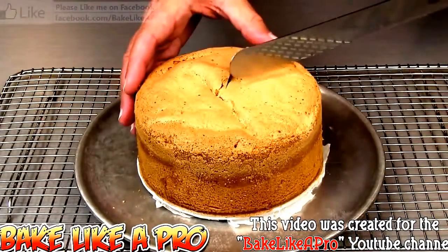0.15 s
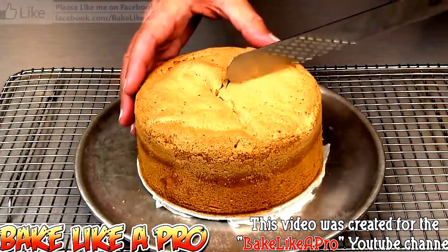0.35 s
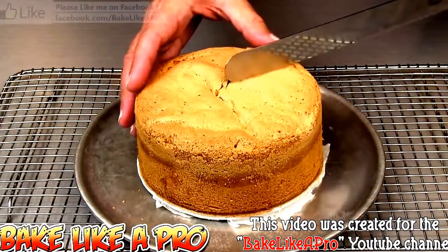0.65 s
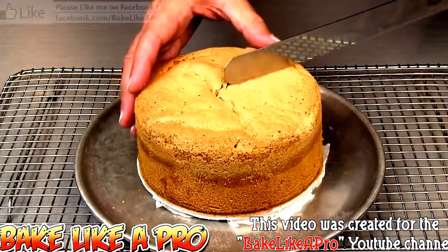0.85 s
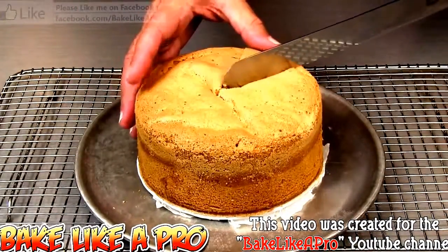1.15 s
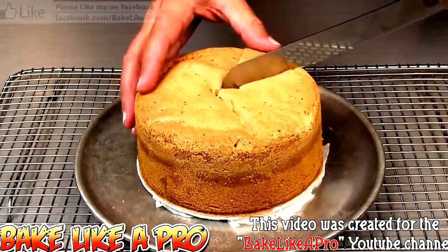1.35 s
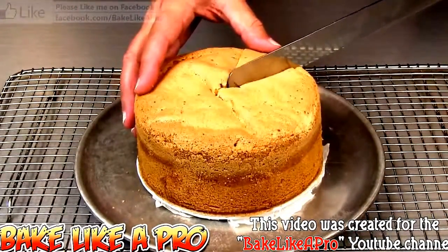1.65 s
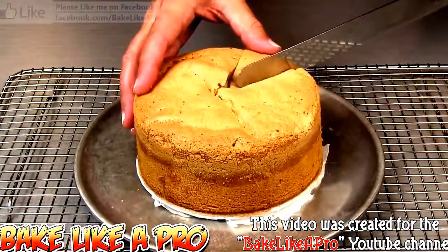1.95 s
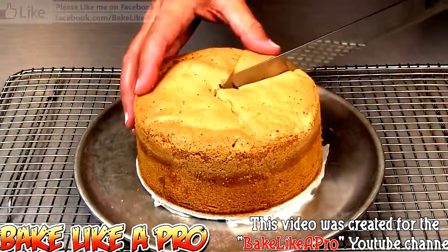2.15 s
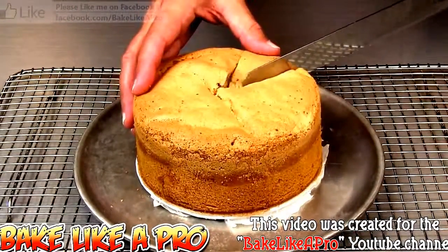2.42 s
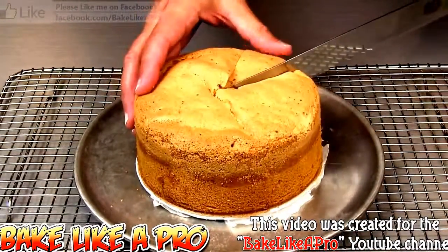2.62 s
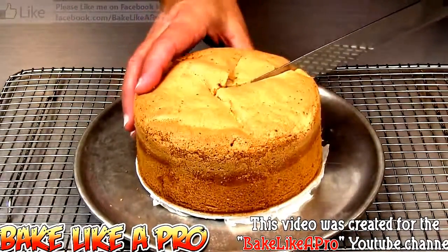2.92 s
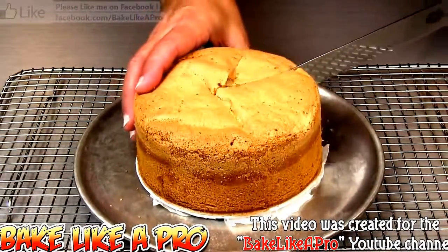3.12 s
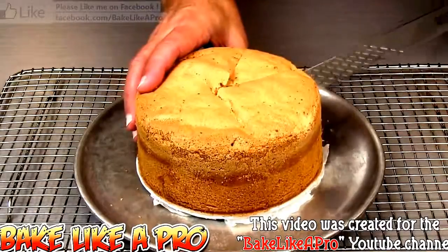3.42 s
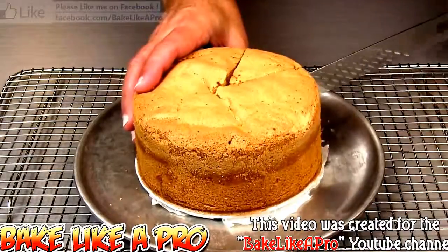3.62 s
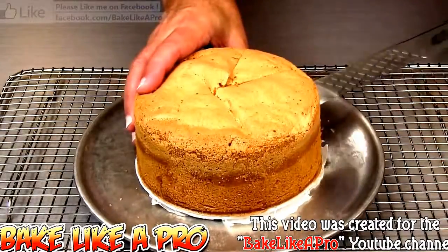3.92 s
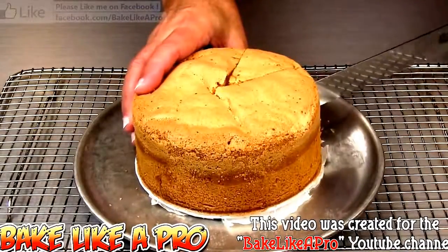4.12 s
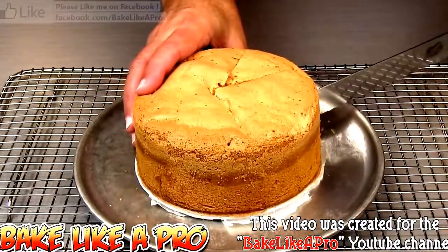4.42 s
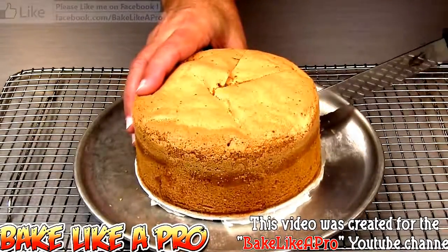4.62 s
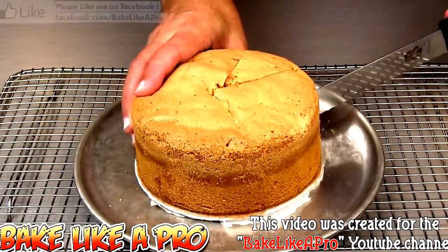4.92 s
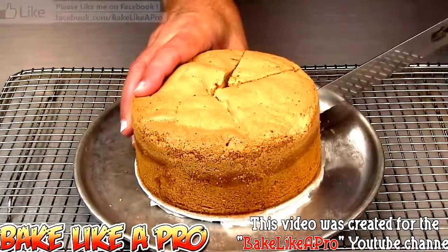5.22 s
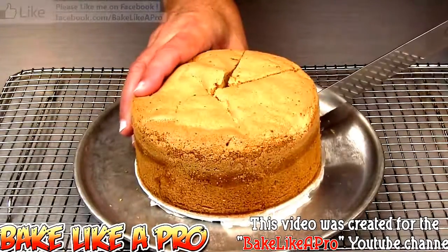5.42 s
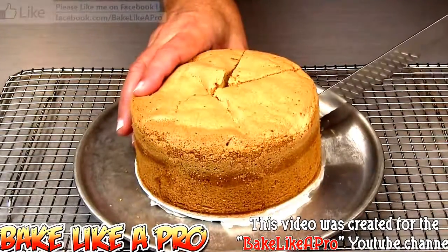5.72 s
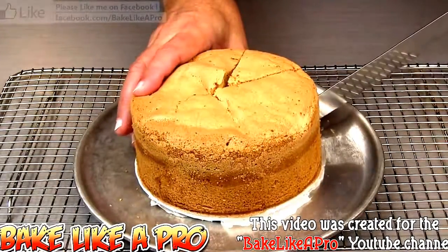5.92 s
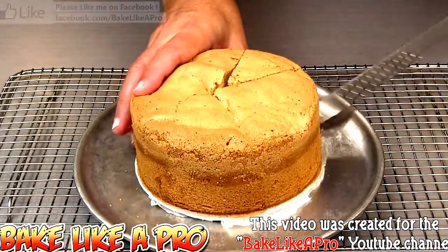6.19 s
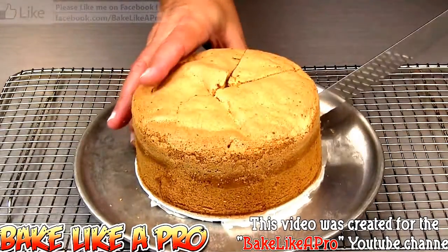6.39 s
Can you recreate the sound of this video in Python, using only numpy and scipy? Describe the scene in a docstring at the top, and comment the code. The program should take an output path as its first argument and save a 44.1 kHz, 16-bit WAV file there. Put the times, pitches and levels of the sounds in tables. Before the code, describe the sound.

Over steady kitchen fan hum, a blade rasps in cake, a pan rattles on a rack, metal scrapes faintly, then one loud clink.

```python
"""A kitchen appliance hums in a small room: filtered fan noise, housing resonances and motor tones.
From the start a long knife's edge rasps faintly in a sponge cake (random slips); moist crumbs snap (noise bursts).
From one second the strokes saw, about five a second, then fewer, and the pan rocks on its wire rack (modes and buzz).
Now and then the blade tings (modes); later it scrapes the pan (slips through broad resonances).
Near the end it clinks against the metal, once hard: an impact of crack, modes, shimmer and thud."""
import sys
import numpy as np
from scipy import signal
from scipy.fft import rfft, irfft, next_fast_len
from scipy.io import wavfile
from scipy.ndimage import map_coordinates

SR = 44100
rng = np.random.default_rng(int(sys.argv[2]) if len(sys.argv) > 2 else 0)


def persist_wave(psi):
    """Save psi, clipped to +-1, as 16-bit WAV."""
    counts = np.round(np.clip(psi, -1, 1) * 32767).astype(np.int16)
    wavfile.write(sys.argv[1], SR, np.atleast_2d(counts).T)


N = 288855


def amp(db):
    """Logarithmic level: decibels to amplitude gain."""
    return 10 ** (np.asarray(db) / 20)


def unit(x):
    """Normalisation: the signal scaled to rms 1."""
    return x / np.sqrt(np.mean(x ** 2) + 1e-20)


def along(points, hz):
    """Spectral envelope: (Hz, value) points interpolated on a logarithmic frequency axis."""
    point_hz, value = np.transpose(points)
    return np.interp(np.log(hz + 1), np.log(point_hz + 1), value)


def wobble(rate):
    """Slow random modulation: a smooth curve through rate random knots a second."""
    knots = rng.standard_normal(int(N * rate / SR) + 4)
    return map_coordinates(knots, [np.arange(N) * rate / SR])


def filtered(x, response):
    """Linear filtering: the spectrum of x times a response of frequency."""
    n = x.shape[-1]
    m = next_fast_len(n + 8192)
    return irfft(rfft(x, m) * response(np.fft.rfftfreq(m, 1 / SR)), m)[..., :n]


def spread(pair, width):
    """Interaural decorrelation: two unrelated signals, as middle and side, make left and right of rms 1."""
    mid, side = pair[0], width * pair[1]
    return unit(np.array([mid + side, mid - side]))


def noise(gain, width, size):
    """Coloured noise: white noise shaped by a gain of frequency, in stereo of rms 1."""
    return spread(filtered(rng.standard_normal((2, size)), gain), width)


def ring(modes, t, width, scatter_db):
    """Modal decay: damped sinusoids of starting mid rms about 1, each with its own phase in mid and side."""
    hz, db, t60 = np.transpose(modes)
    gain = amp(db + scatter_db * rng.standard_normal(len(hz)))
    phase = rng.uniform(0, 2 * np.pi, (2, len(hz), 1))
    decay = amp(-60 * t / t60[:, None])
    waves = gain[:, None] * decay * np.sin(2 * np.pi * hz[:, None] * t + phase)
    mid, side = waves.sum(axis=1) / np.sqrt(np.sum(gain ** 2) / 2)
    return np.array([mid + width * side, mid - width * side])


def add(track, s, sound):
    """Superposition: a sound laid into the track at s seconds."""
    part = track[:, round(s * SR):][:, :sound.shape[1]]
    part += sound[:, :part.shape[1]]


def grains(rate, spiky_db):
    """Stick-slip as shot noise: tiny slips at random moments, a few much larger than the rest."""
    size = amp(spiky_db * np.minimum(rng.exponential(size=N), 4))
    return (rng.random(N) < rate / SR) * size * rng.standard_normal((2, N))


RISE_SHARE, SWELL_POWER = 0.55, 1.74  # part of a push spent speeding up; roundness of its top


def swell(s, db, length):
    """Force envelope: a push of the hand peaks at s; length spans the points where gain is 1/e of the peak."""
    t = np.arange(N) / SR - s
    away = np.abs(t) / (length * np.where(t < 0, RISE_SHARE, 1 - RISE_SHARE))
    gain, near = np.zeros(N), away < 10
    gain[near] = amp(db) * np.exp(-away[near] ** SWELL_POWER)
    return gain


# the fan's broadband spectrum: pitch_hz [Hz], relative level_db [dB per Hz]
FAN_SPECTRUM = [(20, -28), (35, -22), (48, -14), (72, -16), (108, -9), (135, 0), (270, 0.5), (330, -0.5),
                (600, -2), (850, -5), (1300, -9), (2400, -17.5), (5000, -24.5), (16000, -33.5)]
# the housing's resonances: pitch_hz [Hz], half-width_hz at half amplitude [Hz], level_db [dB rms]
HOUSING = [(362, 8.7, -60), (400.3, 16.4, -56.5), (413.4, 11.2, -56.5)]
# the motor's tones: pitch_hz [Hz], mean level_db [dB rms]
MOTOR = [(59.4, -76.5), (98, -70.5), (240, -66.5), (296.1, -61), (560, -66.5)]


def appliance():
    """Broadband flow noise, resonance and tonal hum: fan, narrow housing bands and slightly unsteady motor."""
    t = np.arange(N) / SR
    air = amp(-51.0) * noise(lambda hz: amp(along(FAN_SPECTRUM, hz)), width=0.51, size=N)
    housing = np.zeros((2, N))
    for hz, band, db in HOUSING:
        housing += amp(db) * noise(lambda f: 1 / (1 + ((f - hz) / band) ** 2), width=0.14, size=N)
    motor = np.zeros(N)
    for hz, db in MOTOR:
        level = amp(db + 2.4 * wobble(6.1))
        motor += level * np.sqrt(2) * np.sin(2 * np.pi * hz * t + 0.24 * wobble(8))
    return air + housing + motor


# the room's reverberation time: pitch_hz [Hz], t60_s [s]
ROOM_DECAY = [(150, 0.37), (1000, 0.58), (3000, 0.44), (8000, 0.22), (16000, 0.23)]


def kitchen(x, wet_db):
    """Reverberation: convolution with a short decaying noise tail in which the treble dies first."""
    hz, t, z = signal.stft(rng.standard_normal((2, SR // 2)), SR, nperseg=256)
    decay = amp(-60 * t / along(ROOM_DECAY, hz)[:, None])
    tail = spread(signal.istft(z * decay, SR, nperseg=256)[1], width=0.56)
    # the answer starts 5 ms late
    tail = np.pad(tail / np.linalg.norm(tail[0]), ((0, 0), (SR // 200, 0)))
    wet = signal.fftconvolve(x.mean(axis=0)[None], tail, axes=1)[:, :N]
    return x + amp(wet_db) * wet


# the pan rocking on the rack: start_s [s], relative level_db [dB], chatter_s [s],
# side of the rack [0-1], treble_edge_hz [Hz], bass_edge_hz [Hz]
ROCKINGS = [(1.232, -27, 0.017, 0.1, 5300, 120), (1.3035, -31, 0.015, 0.05, 5140, 150),
            (1.356, -35.5, 0.011, 0, 4170, 300), (1.425, -27, 0.022, 1, 5570, 91),
            (1.487, -37.5, 0.016, 0.6, 5250, 300), (2.606, -42.5, 0.015, 1, 4570, 690),
            (4.228, -43.5, 0.017, 1, 3950, 1700), (4.766, -44, 0.015, 1, 3780, 1800)]
# modes of the loaded rack: pitch_hz [Hz], t60_s [s], relative level_db struck on side 0 [dB], on side 1 [dB]
RACK_MODES = [(137, 0.18, -8, -1), (372, 0.24, -6, -14), (643, 0.12, 2.5, -14), (704, 0.15, 0, -16),
              (998, 0.22, -27, -4.5), (1031, 0.25, -19, -6), (868, .21, -11, 4), (1675, .24, 0, -13),
              (1437, 0.091, -3, -2), (1830, 0.21, -0.5, -29), (2160, 0.22, -17, -5), (2250, 0.2, -17, -11),
              (2380, 0.15, -17, -3), (2624, 0.25, -7, -10), (2770, 0.17, -5, -7), (2830, 0.13, -13, -2),
              (3280, 0.17, -17, -9), (3670, 0.12, -18, -17), (4040, 0.09, -22, -15), (4380, 0.11, -5, -1),
              (4730, .1, -17, -16), (5500, 0.1, -10, -7)]
# the wires' dense buzz: pitch_hz [Hz], relative level_db [dB per Hz]
WIRE_BUZZ = [(60, -30), (130, 1), (500, -2.5), (1200, -3), (1600, 3), (2700, 2.5), (3800, -1), (4500, 0.5),
             (8000, 0.5), (16000, -21)]


def rack():
    """Modal excitation by position: the pan chatters on the wires; the side that lands sets which modes ring."""
    out, t = np.zeros((2, N)), np.arange(SR // 2) / SR
    for s, db, length, side, treble_hz, bass_hz in ROCKINGS:
        modes = [(hz, one + side * (other - one), t60) for hz, t60, one, other in RACK_MODES]
        body = ring(modes, t, width=0.31, scatter_db=0.5) * (1 - np.exp(-t / 0.0074))
        chatter = (1 - np.exp(-t / 0.0007)) * amp(-60 * np.maximum(t - length, 0) / 0.02)
        # the wires buzz on after the chatter has stopped
        lingering = amp(-14.5 - 60 * t / 0.21)
        buzz = noise(lambda hz: amp(along(WIRE_BUZZ, hz)), width=0.27, size=len(t)) * (chatter + lingering)

        def contact(hz):
            """Contact bandwidth: treble falls to a floor above one edge, bass fades below the other."""
            treble = amp(-18.5) + 1 / (1 + (hz / treble_hz) ** 22)
            return treble * hz ** 2 / (hz ** 2 + bass_hz ** 2)

        add(out, s, filtered(amp(db - 0.5) * body + amp(db - 3.5) * buzz, contact))
    return out


# the blade slipping free: start_s [s], level_db [dB]
SLIPS_FREE = [(2.204, -57), (3.279, -42.5), (3.345, -50), (3.453, -49), (4.489, -55)]
# the blade's own modes: pitch_hz [Hz], relative level_db [dB], t60_s [s]
BLADE_MODES = [(4590, -3, 0.037), (4960, 2, 0.038), (5400, -6, 0.057), (6200, -8, 0.054), (8750, -9, 0.047)]


def tings():
    """Damped free vibration: the thin blade springs loose and rings briefly, damped by the cake."""
    out, t = np.zeros((2, N)), np.arange(SR // 5) / SR
    for s, db in SLIPS_FREE:
        add(out, s, amp(db) * ring(BLADE_MODES, t, width=0.32, scatter_db=1.5))
    return out


# the blade's flat rubbing the pan's rim: pitch_hz [Hz], width_hz at half power [Hz], relative level_db [dB]
RIM_RESONANCES = [(960, 180, 0), (1450, 160, 0), (2045, 190, 4), (2560, 160, -2.5), (2980, 210, -9),
                  (3300, 100, -4.5), (3620, 160, -5.5), (4270, 370, -10), (4600, 300, -10),
                  (5050, 110, -14), (5500, 110, -11), (7700, 2500, -19), (12500, 4000, -20)]
# the blade dragging on the pan: peak_s [s], level_db before the unsteady force [dB], length_s [s]
DRAG_PUSHES = [(4.028, -52.5, 0.037), (4.56, -62, .22), (4.846, -63, 0.19), (5.187, -54, 0.14),
               (5.34, -55.5, .12), (5.6, -61, 0.16), (5.814, -59, 0.18), (6.303, -48, 0.052),
               (6.325, -32, 0.01)]
# the blade catching and skidding on the pan: peak_s [s], relative level_db [dB], 1/e half-length_s [s]
CATCHES = [(5.151, -49.5, 0.0066), (5.196, -49.5, 0.0072), (5.215, -49, .005), (5.23, -52, .008),
           (5.302, -50, .006), (5.324, -53, .009), (5.392, -50, 0.013), (5.567, -54.5, 0.0092),
           (5.622, -55, .004)]
# the dragged blade's faint whistle
WHISTLE_S, WHISTLE_DB, WHISTLE_LENGTH_S, WHISTLE_HZ = 4.75, -67, 0.57, 4500


def drag():
    """Stick-slip friction: small slips excite the pan, whose resonances the pressure keeps broad."""
    t = np.arange(N) / SR

    def metal(f):
        """Resonance: the summed power of the rim's bands, as amplitude."""
        return np.sqrt(sum(amp(2 * db) / (1 + ((f - hz) / (band / 2)) ** 2) for hz, band, db in RIM_RESONANCES))

    rub = spread(filtered(grains(rate=2400, spiky_db=1.5), metal), width=0.26)
    force = sum(swell(*push) for push in DRAG_PUSHES) * amp(0.86 * wobble(70))
    catches = sum(amp(db - 1) * np.exp(-((t - s) / length) ** 2) for s, db, length in CATCHES)
    whistle = noise(lambda hz: 1 / (1 + ((hz - WHISTLE_HZ) / 300) ** 2), width=.4, size=N)
    return (force + catches) * rub + swell(WHISTLE_S, WHISTLE_DB, WHISTLE_LENGTH_S) * whistle


# the blade striking the pan: start_s [s], relative crack_db [dB], ring_db [dB], shimmer_db [dB], thud_db [dB],
# tilt of crack, shimmer and thud [dB per octave]
STRIKES = [(5.754, -40.5, -49, -60.5, -76, 1.8), (6.3268, -10, -16.5, -23.8, -37.5, -.3),
           (6.356, -42, -40, -32, -45, 1.5), (6.385, -37, -47, -34.5, -39.5, 1),
           (6.423, -26, -59, -44.5, -60, 4.5)]
# modes of blade and pan together: pitch_hz [Hz], relative level_db [dB], t60_s [s]
PAN_MODES = [(360, -10, .28), (722, -12, .22), (960, -13, .38), (1377, -13, .2), (1684, -16, .5),
             (1843, -16, .45), (1963, -10, .33), (2004, -5, .42), (2080, -13, .45), (2172, -13, .36),
             (2319, -5, .22), (2456, -9, .38), (2502, -14, .45), (2672, 1.5, .11), (2960, -10, .3),
             (3045, -3, .18), (3347, 1, .085), (3410, -6, .16), (3716, 4, .06), (3850, 2, .05),
             (4072, -1, .11), (4761, 2, .085), (5121, -8, .12), (5430, -4, .07), (5642, -9, .1),
             (6120, -12, .19), (6738, -14, .2), (8140, -6, .13)]
# spectrum of the contact: pitch_hz [Hz], relative level_db [dB per Hz]
CRACK_SPECTRUM = [(80, -48), (300, -10.5), (1000, -8), (1600, -14), (2400, 2), (4000, -1), (6300, -11),
                  (8000, -9), (13000, -12.5), (16000, -21)]
# spectrum of the dense high modes: pitch_hz [Hz], relative level_db [dB per Hz]
SHIMMER_SPECTRUM = [(100, -41), (350, -14), (1000, -4), (1500, -3), (2200, 1), (3300, -9), (6000, -10),
                    (9000, -12), (13000, -17), (16000, -26)]
# spectrum of the loaded pan's thud: pitch_hz [Hz], relative level_db [dB per Hz]
THUD_SPECTRUM = [(40, -33), (105, -43), (145, 9.5), (190, -15), (290, -2.5), (400, -8), (900, -25),
                 (3000, -70)]


def clinks():
    """Impact excitation: steel on steel snaps, cracks, rings in modes, shimmers and thuds under the cake."""
    out, t = np.zeros((2, N)), np.arange(SR // 2) / SR
    snap = np.cos(2 * np.pi * 3400 * t) * amp(-60 * t / 0.0022)
    for s, crack_db, ring_db, shimmer_db, thud_db, tilt_db in STRIKES:

        def burst(points):
            """Spectral tilt: coloured noise leaning about 3 kHz."""
            tilted = lambda hz: amp(along(points, hz) + tilt_db * np.log2((hz + 50) / 3000))
            return noise(tilted, width=.36, size=len(t))

        crack = amp(crack_db) * (3.5 * snap + burst(CRACK_SPECTRUM) * amp(-60 * t / 0.05))
        shimmer = burst(SHIMMER_SPECTRUM) * amp(shimmer_db - 60 * t / 0.45)
        thud = burst(THUD_SPECTRUM) * amp(thud_db - 60 * t / 0.29) * (1 - np.exp(-t / 0.0029))
        modes = amp(ring_db) * ring(PAN_MODES, t, width=0.25, scatter_db=1.5)
        add(out, s, crack + shimmer + thud + modes)
    # so small a pan radiates no deep bass
    return signal.sosfilt(signal.butter(4, 110, "high", fs=SR, output="sos"), out)


# moist crumbs letting go of the blade: start_s [s], relative level_db [dB], centre pitch_hz [Hz]
CRUMB_SNAPS = [(.598, -44, 8000), (.645, -41, 5000), (.775, -48, 10000), (1.109, -30, 10600),
               (1.515, -39, 8900), (1.865, -30.5, 12000), (2.006, -38, 8000), (2.05, -41, 9000),
               (2.12, -40, 10000), (2.132, -42, 11000), (2.521, -44, 9000), (2.548, -41, 5000),
               (2.81, -41, 11000), (2.974, -40, 10000), (3.279, -37, 6440), (3.283, -42, 8000),
               (3.452, -32, 5100), (3.832, -37.5, 8000), (3.882, -42, 4470), (4.098, -31.5, 9500),
               (4.315, -36, 7000), (4.489, -34.5, 6600), (4.524, -42, 7000), (4.535, -38, 6500),
               (4.745, -40.5, 10000), (4.838, -41, 10000), (4.92, -40.5, 9000), (5.044, -42, 8000),
               (5.99, -30.5, 10500), (6.04, -38, 7100), (6.158, -37, 5930)]


def crumbs():
    """Adhesive release: each sticky crumb lets go with one broad snap and a brief crackle."""
    out, t = np.zeros((2, N)), np.arange(SR // 20) / SR
    decay = amp(-60 * t / 0.0094) + amp(-17 - 60 * t / .07)
    for s, db, centre_hz in CRUMB_SNAPS:
        # a broad band falling away by octaves from the centre
        band = lambda hz: 1 / (1 + (np.log2((hz + 1) / centre_hz) / 0.89) ** 2)
        snap = noise(band, width=0.31, size=len(t))
        add(out, s + 0.0012, amp(db - 7.0) * snap * decay)
    return out


# sawing strokes: peak_s at the fastest [s], rasp level_db before random clumping [dB], length_s [s]
SAW_STROKES = [(1.077, -53, 0.15), (1.27, -52, 0.14), (1.438, -48.5, 0.03), (1.505, -50, 0.089),
               (1.62, -55, 0.13), (1.84, -55.5, 0.11), (2.03, -58.5, 0.11), (2.27, -53.5, .11),
               (2.441, -55.5, 0.086), (2.68, -57, .16), (2.838, -60, 0.077), (3.093, -58, 0.12),
               (3.295, -56, 0.08), (3.42, -54.5, 0.092), (3.617, -58.5, 0.17), (4.029, -50, 0.063),
               (4.092, -58, 0.072), (4.195, -60, .06), (4.333, -58, .04), (4.518, -59, 0.09),
               (4.754, -58.5, 0.065), (4.85, -59, 0.034), (5.062, -57.5, 0.047), (5.194, -59, 0.19),
               (5.76, -58, 0.033), (6.05, -60, 0.092)]
# the tearing crumb's spectrum: pitch_hz [Hz], relative level_db [dB per Hz]
CRUMB_SPECTRUM = [(200, -10), (700, -5), (1500, 0.5), (3000, -0.5), (5000, 1.5), (6500, -4), (8300, -0.5),
                  (10500, -3.5), (13000, -3.5), (16000, -4)]
CLING_DB, SAWING_DB = -69, -68  # rasp of the sponge clinging to the blade: always, and added while it saws
SAWING_S, SAWING_LENGTH_S = 3.05, 1.9  # peak and length of the sawing


def sponge():
    """Fracture noise: the edge tears countless small cells; coarse, medium and fine ones clump separately."""
    tearing = np.zeros((2, N))
    for centre_hz in (2000, 7000, 12000):
        band = lambda hz: amp(along(CRUMB_SPECTRUM, hz)) * np.exp(-((hz - centre_hz) / 3600) ** 2)
        tearing += filtered(grains(rate=4500, spiky_db=2), band) * amp(2.0 * wobble(45))
    cling = amp(CLING_DB) + swell(SAWING_S, SAWING_DB, SAWING_LENGTH_S)
    # unrelated rasps add in power
    effort = np.sqrt(cling ** 2 + sum(swell(*stroke) ** 2 for stroke in SAW_STROKES))
    return effort * amp(2.3 * wobble(60)) * spread(tearing, width=0.31)


def scene():
    """Superposition of sources: cake, rack and blade, each with its reverberation, and the appliance."""
    background = appliance()
    rocking = kitchen(rack(), wet_db=-6.5)
    blade = kitchen(clinks() + drag(), wet_db=-10)
    cake = kitchen(sponge() + crumbs() + tings(), wet_db=-7.5)
    return background + rocking + blade + cake


# the microphone pair's balance: pitch_hz [Hz], left over right level_db [dB]
BALANCE = [(60, -1.5), (200, -1), (380, 1.5), (700, 1.5), (1300, 3), (2400, 0.5), (4400, 0)]
# the microphone pair's side gain: pitch_hz [Hz], level_db [dB]
SIDE_GAIN = [(60, 3), (150, -5.5), (350, 0), (650, 0), (1300, 1), (2600, 0), (8000, 0)]
TOP_HZ = 15900  # upper band limit


def record(dry):
    """Transducer response: the pair colours each side; the recorder clips at full scale, then limits the band."""
    mid = dry.mean(axis=0)
    side = filtered(dry[0] - mid, lambda hz: amp(along(SIDE_GAIN, hz)))
    balance = lambda hz: amp(np.outer([.5, -.5], along(BALANCE, hz)))
    pair = filtered(np.array([mid + side, mid - side]), balance)
    return filtered(np.clip(pair, -1, 1), lambda hz: hz < TOP_HZ)


dry = scene()
out = record(dry)
persist_wave(out)
```